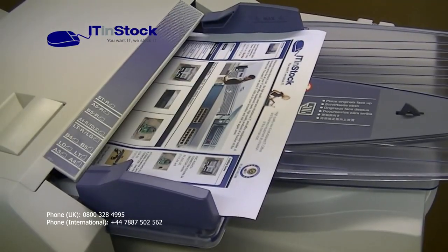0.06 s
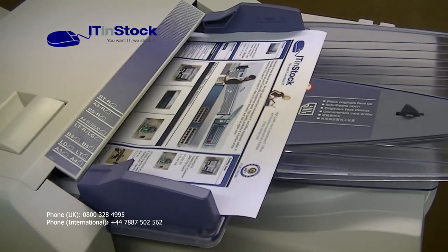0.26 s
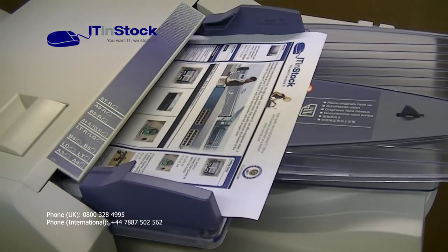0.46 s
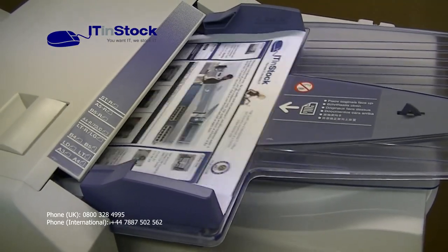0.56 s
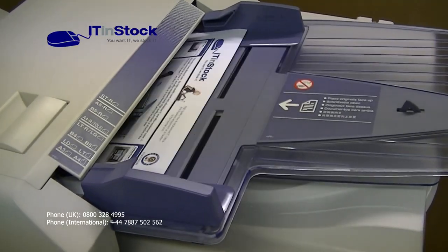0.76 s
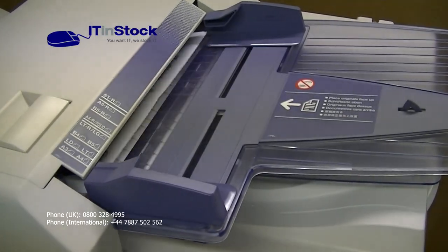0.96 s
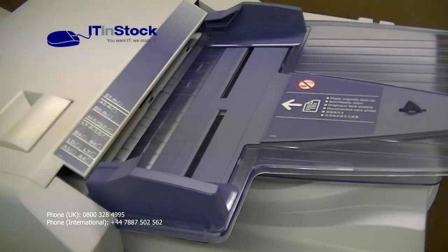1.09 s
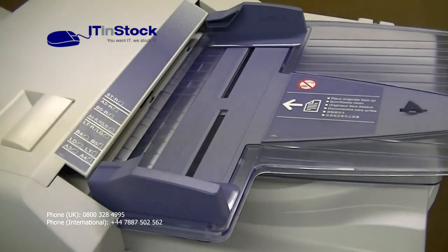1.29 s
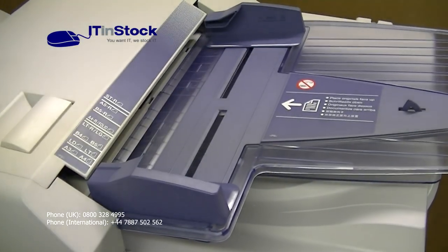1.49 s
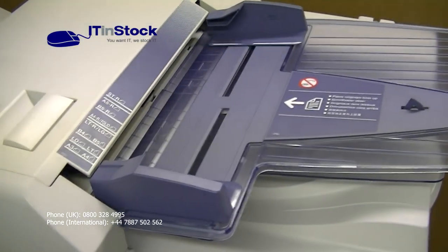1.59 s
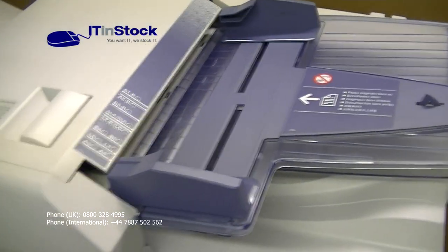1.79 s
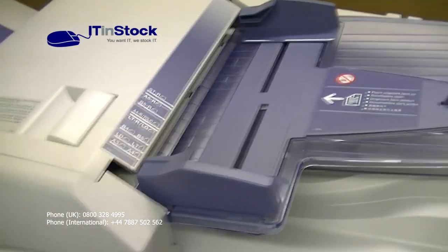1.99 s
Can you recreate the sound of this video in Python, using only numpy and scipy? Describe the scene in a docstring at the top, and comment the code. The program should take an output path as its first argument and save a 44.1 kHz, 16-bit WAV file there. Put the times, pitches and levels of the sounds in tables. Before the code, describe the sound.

A copier's feeder pulls a sheet through with plastic clatter, whirring motors and a squeaking roller.

```python
"""Copier feeding one sheet

In an office, close to the document feeder, on a narrow microphone pair. A cooling fan hums underneath.
A latch ticks and a clutch drops the pick-up arm with a plastic clatter. Stepper motors jerk into motion
and whine through their gears, the sheet hisses along its guides, a rubber roller squeals and gates snap."""
import sys
import numpy as np
from scipy import signal
from scipy.fft import rfft, irfft
from scipy.io import wavfile

SR = 44100
rng = np.random.default_rng(int(sys.argv[2]) if len(sys.argv) > 2 else 0)


def inscribe(sig):
    """Save sig as 16-bit PCM at rate SR to the path in sys.argv[1].

    A 1-D sig is mono; a 2-D sig holds one channel per row.
    Samples are clipped to [-1, 1] before scaling.
    """
    pcm = np.round(np.clip(np.atleast_2d(sig).T, -1, 1) * 32767)
    wavfile.write(sys.argv[1], SR, pcm.astype(np.int16))


N = 90404
T = np.arange(N) / SR
# The hollow clack of plastic. Each row: frequency in Hz, relative level in dB.
CLACK_SPECTRUM = [(100, -38), (170, -19), (400, -11.5), (800, -4), (1400, -1.5), (2000, -10.5), (3000, -18),
                  (6000, -55)]


def from_db(db):
    """Decibels to gain."""
    return 10 ** (np.asarray(db) / 20)


def unit_rms(x):
    """Scale to unit power."""
    return x / np.sqrt(np.mean(x ** 2) + 1e-20)


def in_time(rows):
    """Join timed rows by straight lines, one curve for each column after the time."""
    times, *columns = np.transpose(rows)
    return [np.interp(T, times, column) for column in columns]


def decay(age, t60):
    """Gain that falls 60 dB in t60 seconds."""
    return np.exp(-np.log(1000) * age / t60)


def high_pass(x, hz, order):
    """Roll off what lies below hz."""
    return signal.sosfilt(signal.butter(order, hz, "high", fs=SR, output="sos"), x)


def colour(x, spectrum):
    """Weight a sound by rows of frequency in Hz and gain in dB."""
    hz, db = np.transpose(spectrum)
    bins = np.maximum(np.fft.rfftfreq(N, 1 / SR), 1)
    return irfft(rfft(x) * from_db(np.interp(np.log(bins), np.log(hz), db)), N)


def noise(spectrum, per_s=1000, grain=0):
    """Coloured noise of unit power; grain is the share that comes from tiny random contacts."""
    contacts = (rng.random(N) < per_s / SR) * rng.standard_normal(N)
    mix = np.sqrt(1 - grain) * rng.standard_normal(N) + np.sqrt(grain) * unit_rms(contacts)
    return unit_rms(high_pass(colour(mix, spectrum), spectrum[0][0], order=2))


def drift(rate_hz):
    """A random wander of unit power, mostly slower than rate_hz."""
    pole = np.exp(-2 * np.pi * rate_hz / SR)
    return unit_rms(signal.lfilter([1], [1, -2 * pole, pole * pole], rng.standard_normal(2 * N))[N:])


def tone(hz, rough):
    """A tone whose strength and phase flutter, the rougher the faster, up to a narrow band of noise."""
    phase = 2 * np.pi * np.cumsum(hz) / SR
    rough = np.clip(rough, 0.05, 1)
    flutter_hz = 59 * rough + 0.038 * np.mean(hz) * rough ** 4
    flutter = drift(flutter_hz) * np.sin(phase) + drift(flutter_hz) * np.cos(phase)
    return unit_rms((1 - rough ** 2) * np.sin(phase) + rough * flutter)


def ring(modes, age):
    """One blow on a set of modes, each struck with a slightly random strength."""
    return sum(from_db(db + rng.standard_normal()) * decay(age, t60) * np.sin(2 * np.pi * hz * age)
               for hz, db, t60 in modes)


def panels(x):
    """The plastic panels lift some bands and swallow others."""
    # Each row: centre in Hz, width in Hz, gain in dB.
    resonances = [(296, 103, 5), (367, 26, 7), (407, 120, -6.5), (742, 300, 3), (882, 81, 3.5),
                  (1232, 10, 6.5), (1298, 10, 4.5), (1650, 25, 8), (2240, 88, 3.5), (3130, 440, 4),
                  (3740, 590, -1.5)]
    for hz, width_hz, db in resonances:
        gain, width = from_db(db / 2), np.pi * width_hz / SR
        tuning = -2 * np.cos(2 * np.pi * hz / SR)
        x = signal.lfilter([1 + width * gain, tuning, 1 - width * gain],
                           [1 + width / gain, tuning, 1 - width / gain], x)
    return x


def fan():
    """The cooling fan moves air with a steady rush and a hum."""
    # Each row: frequency in Hz, relative level in dB.
    air_spectrum = [(20, -10), (50, -0.5), (95, 2), (140, 9.5), (300, 5), (600, 3.5), (1200, 2),
                    (2200, -14), (4000, -17), (9000, -43), (16000, -63)]
    hum = tone(hz=np.full(N, 180.8), rough=0.1)
    return from_db(-46.5) * noise(air_spectrum) + from_db(-47.5) * hum


def whines(fade_s=0.012):
    """Motors and gears sing, and the sheet squeaks roughly, each during its stage of the feed."""
    # Each row: start and end in seconds, pitch in Hz, glide in Hz, level in dB, roughness from 0 to 1.
    voices = [(0.272, 0.405, 133, 11, -39, 0.28), (0.592, .72, 4570, -20, -40.5, 0.92),
              (0.647, 0.758, 1995, 28, -35.5, 0.7), (1.03, 1.335, 494, -0.5, -42, 0.2),
              (1.374, 1.505, 2150, 74, -47, 0.03), (1.384, 1.7, 522, 30, -47.5, 0),
              (1.545, 1.724, 1423, -6, -40.5, .45), (1.545, 2.1, 609, 1.5, -37.5, 0.31),
              (1.553, 2.1, 798, -0.5, -41.5, 0.16), (1.548, 2.1, 1400, -0.5, -44.5, 0.34),
              (1.667, 1.77, 2310, -27, -35.5, 0.7), (1.81, 2.03, 915, -6.5, -44.5, 0.27),
              (1.752, 1.82, 264, 7, -31, 0.07), (1.745, 2.07, 1178, 11, -48, 0.65),
              (1.73, 1.89, 680, -6.5, -38.5, 0.22), (1.76, 2.1, 1200, 0.5, -44, 0.5)]
    out = np.zeros(N)
    for start, end, hz, glide_hz, db, rough in voices:
        gate = np.clip(np.minimum(T - start, end - T) / fade_s, 0, 1)
        pitch = hz + np.interp(T, [start, end], [0, glide_hz])
        out += from_db(db) * gate * tone(pitch, rough)
    return out


def transport():
    """Gear teeth rattle and paper fibres rub along the guides, heard through the panels."""
    # Each row: frequency in Hz, relative level in dB.
    gear_spectrum = [(80, -18), (120, -21), (170, 5.5), (220, -6.5), (310, 5.5), (480, 0), (750, -3),
                     (1300, -6), (2300, -16.5), (4000, -36.5), (10000, -62.5)]
    paper_spectrum = [(500, -12), (1100, 7.5), (2000, 10.5), (3300, 1), (5000, 1.5), (8000, -1.5),
                      (10500, -5), (13000, -14), (16000, -22)]
    # Each row: time in seconds, level in dB ahead of the panels.
    gear_levels = [(.225, -60), (.26, -31), (.34, -23.5), (.41, -39), (.52, -49), (.55, -24), (.60, -32.5),
                   (.68, -36.5), (.77, -44.5), (.815, -27), (.85, -30), (.94, -35.5), (.99, -22.5),
                   (1.08, -34), (1.15, -28.5), (1.22, -32), (1.33, -27.5), (1.37, -44), (1.49, -43),
                   (1.51, -24), (1.56, -34.5), (1.65, -38), (1.71, -27), (1.80, -28.5), (1.845, -34.5),
                   (2.05, -36)]
    paper_levels = [(.53, -60), (.585, -30), (.66, -32.5), (.77, -33), (.81, -27), (.85, -54), (.90, -37.5),
                    (.98, -22.5), (1.07, -36), (1.12, -33.5), (1.28, -34), (1.335, -44.5), (1.40, -56),
                    (1.485, -58.5), (1.51, -39.5), (1.66, -37.5), (1.71, -32.5), (1.79, -42.5),
                    (1.9, -41.5), (2.05, -43)]
    gears = from_db(in_time(gear_levels)[0]) * noise(gear_spectrum, per_s=400, grain=0.3)
    sheet = from_db(in_time(paper_levels)[0]) * noise(paper_spectrum, per_s=3100, grain=0.32)
    return panels(gears + sheet)


def latch():
    """A light pawl clicks with a hard edge and rings its own few modes."""
    # Each row: start in seconds, ring level in dB, edge level in dB.
    ticks = [(0.0536, -33.5, -52), (.0626, -26, -31), (.0803, -31, -38.5), (1.346, -40, -32),
             (1.372, -32, -32), (1.430, -38, -37.5)]
    # Each row: frequency in Hz, relative level in dB, 60 dB decay time in seconds.
    pawl_modes = [(1060, -2, .045), (1514, 0, .04), (1825, -1, .03), (2645, -9.5, 0.041),
                  (4230, -13, 0.039)]
    # Each row: frequency in Hz, relative level in dB.
    edge_spectrum = [(500, 11.5), (10000, -8), (16000, -25)]
    out, edge_noise = np.zeros(N), noise(edge_spectrum)
    for start, ring_db, edge_db in ticks:
        age = np.maximum(T - start, 0)
        edge = from_db(edge_db) * decay(age, t60=0.048) * edge_noise
        out += (T > start) * (from_db(ring_db) * ring(pawl_modes, age) + edge)
    return out


def motor_starts(ramp_hz_per_s=2240, rise_s=0.0078, hold_s=0.016, fall_s=0.0051, overtone_db=-11):
    """A stepper's first slow steps shake the frame and rattle the gears, fading as the rate climbs."""
    # Each row: start in seconds, first step rate in Hz, level in dB.
    jerks = [(.528, 300, -16), (1.495, 296.3, -18), (.972, 163.5, -17.5)]
    out, rattle = np.zeros(N), from_db(-14.5) * noise(CLACK_SPECTRUM)
    for start, hz, db in jerks:
        age = np.maximum(T - start, 0)
        phase = 2 * np.pi * (hz * age + ramp_hz_per_s * age ** 2 / 2)
        envelope = np.minimum(age / rise_s, 1) * np.exp(-np.maximum(age - hold_s, 0) / fall_s)
        steps = sum(from_db(overtone_db * k) * np.sin((k + 1) * phase) for k in range(3))
        out += from_db(db) * envelope * (steps + rattle * (1 + np.sin(phase)) / 2)
    return out


def roller_squeal():
    """A rubber roller sticks and slips on the paper."""
    # Each row: time in seconds, pitch in Hz, level in dB.
    contour = [(.79, 1585, -46), (.806, 1562, -16), (.83, 1565, -36), (.855, 1590, -37), (.87, 1591, -18),
               (.887, 1618, -24.5), (.907, 1616, -21), (.917, 1618, -27.5), (.936, 1612, -25),
               (.953, 1551, -25.5), (.966, 1640, -23.5), (.975, 1650, -45)]
    hz, db = in_time(contour)
    slipping = (T > contour[0][0]) * (T < contour[-1][0])
    return from_db(db) * slipping * tone(hz, rough=0.18)


def pings():
    """Clutch plate, pick-up arm and paper gate ring briefly as they snap over."""
    # Each row: start in seconds, pitch in Hz, level in dB, 60 dB decay time in seconds.
    strikes = [(.235, 4660, -14.5, 0.028), (.275, 2300, -16, 0.048), (.29, 1220, -14, 0.12),
               (.342, 782, -12, .05), (.352, 2317, -22.5, 0.14), (1.297, 2196, -17, 0.062),
               (1.297, 2920, -20, 0.089), (.254, 646, -10.5, 0.044)]
    return sum(ring([mode], np.maximum(T - start, 0)) for start, *mode in strikes)


def knocks(strike_s=0.00084):
    """Plastic parts strike, ringing housing, cover and a spray of dense modes that dies in the room."""
    # Each row: start in seconds, levels in dB of body thump, hollow clack, hard crack and treble snap,
    # then the spray's 60 dB decay time in seconds.
    blows = [(0.234, -24, -26, -24, -26.5, 0.14), (0.2502, -12, -17, -16, -14, 0.06),
             (.271, -28, -20, -18, -29, 0.049), (0.279, -24, -13.5, -18, -23, 0.1),
             (0.29, -47, -9.5, -18, -22, 0.023), (0.302, -39, -22, -23.5, -32.5, 0.19),
             (.329, -24, -18, -18.5, -27.5, 0.15), (.342, -29, -15.5, -22, -24, 0.031),
             (0.382, -38, -26, -23, -33, 0.062), (.531, -21.5, -32, -35.5, -46, 0.076),
             (.546, -21, -46, -27, -36, 0.028), (.578, -33, -43, -23, -26, 0.023),
             (0.669, -55, -30, -19.5, -42, 0.017), (0.776, -50, -26, -18.5, -23.5, 0.08),
             (.8025, -58, -15, -13.5, -17, 0.048), (.858, -21.5, -35, -46, -52, 0.045),
             (.8648, -30, -23, -29, -36, 0.07), (.929, -56, -26.5, -25, -44, 0.089),
             (0.96, -34, -18.5, -21, -27, 0.065), (0.972, -23, -14, -23.5, -19.5, 0.059),
             (.992, -26, -27, -26, -39, 0.061), (1.03, -52, -31, -18.5, -27.5, 0.031),
             (1.0467, -48, -20.5, -22, -19.5, 0.027), (1.12, -37, -27.5, -23.5, -33, 0.056),
             (1.257, -28, -24, -46, -35, 0.091), (1.293, -48, -17, -16, -19, 0.039),
             (1.2985, -43, -19, -12.5, -15, .034), (1.329, -27, -33, -48, -54, 0.036),
             (1.498, -23.5, -28.5, -47, -50, .04), (1.711, -23, -25.5, -25, -53, 0.032),
             (1.737, -55, -33, -23, -23.5, 0.049), (1.745, -47, -39, -20.5, -20, 0.038),
             (1.813, -36.5, -31, -35, -54, 0.02)]
    # Each row: frequency in Hz, relative level in dB, 60 dB decay time in seconds.
    housing_modes = [(146, -25, 0.6), (186, -23.5, 0.12), (277, -11.5, 0.19), (311.6, -4.5, 0.32),
                     (360, 5.5, 0.11), (492.5, -1, 0.074), (641.5, -6.5, 0.24)]
    cover_modes = [(748.4, -10.5, 0.13), (887, -15.5, 0.099), (1100, -21, 0.12), (1183, -8.5, 0.095),
                   (1358, -11, 0.071), (2040, -18, 0.12), (2292, -11.5, 0.13), (2384, -15, 0.052),
                   (2610, -20, 0.075)]
    # Each row: frequency in Hz, relative level in dB.
    crack_spectrum = [(700, -31), (1500, -3), (2300, 2), (3100, -4), (4000, -6.5), (8000, -33)]
    snap_spectrum = [(1000, -5), (2500, -13), (4300, -2.5), (7000, -2), (10000, -7.5), (13000, -18),
                     (16000, -44)]
    ringing, clack_power, crack_power, snap_power = np.zeros((4, N))
    for start, thump_db, clack_db, crack_db, snap_db, t60 in blows:
        first = int(start * SR)
        age = T[:min(N - first, SR // 2)]
        span = slice(first, first + len(age))
        rise = (1 - np.exp(-age / strike_s)) ** 2
        direct = decay(age, t60)
        long_tailed = rise * np.hypot(direct, from_db(-18) * decay(age, t60=0.27))
        short_tailed = rise * np.hypot(direct, from_db(-20) * decay(age, t60=0.12))
        clack_power[span] += (from_db(clack_db) * long_tailed) ** 2
        crack_power[span] += (from_db(crack_db) * long_tailed) ** 2
        snap_power[span] += (from_db(snap_db) * short_tailed) ** 2
        ringing[span] += from_db(thump_db) * rise * ring(housing_modes, age)
        ringing[span] += from_db(clack_db) * rise * ring(cover_modes, age)
    clack = np.sqrt(clack_power) * noise(CLACK_SPECTRUM)
    crack = np.sqrt(crack_power) * noise(crack_spectrum)
    snap = np.sqrt(snap_power) * noise(snap_spectrum, per_s=3000, grain=0.37)
    return ringing + panels(clack + crack + snap)


def scene():
    """The feeder sits centred before the microphones, with a trace of width and a faint rumble."""
    # Width of the pair. Each row: frequency in Hz, side against middle in dB.
    pair_width = [(150, -58), (700, -34), (3000, -26.5), (8000, -43), (12000, -43)]
    # Rumble that differs between the two sides. Each row: frequency in Hz, relative level in dB.
    rumble_spectrum = [(25, 0), (100, -9), (400, -4.5), (3000, -10), (12000, -34)]
    mechanism = knocks() + pings() + latch() + transport() + motor_starts()
    mechanism = high_pass(mechanism, hz=128.6, order=5)  # light plastic parts radiate little bass
    mid = mechanism + whines() + roller_squeal() + fan()
    quarter_cycle_shifted = np.imag(signal.hilbert(mid))
    side = colour(quarter_cycle_shifted, pair_width) + from_db(-65) * noise(rumble_spectrum)
    return np.array([mid + side, mid - side])


def record(dry):
    """The recorder rounds the peaks and cuts the top treble."""
    cutoff_hz = 15900
    rounded = 1.334 * np.tanh(dry / 1.277)
    return signal.sosfilt(signal.ellip(12, 0.1, 90, cutoff_hz, fs=SR, output="sos"), rounded)


dry = scene()
out = record(dry)
inscribe(out)
```